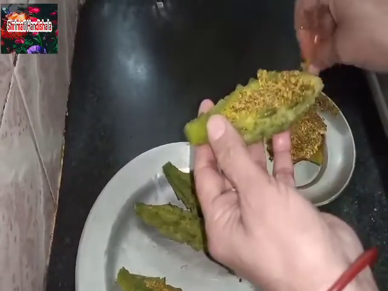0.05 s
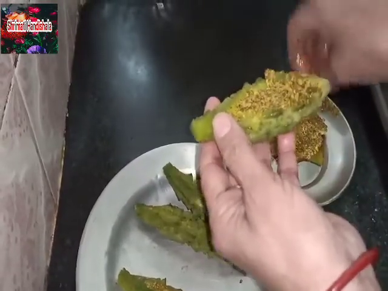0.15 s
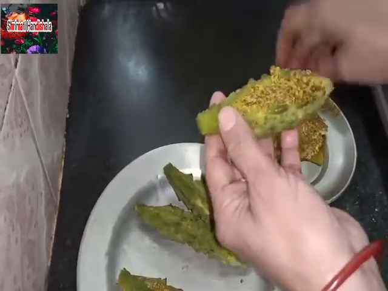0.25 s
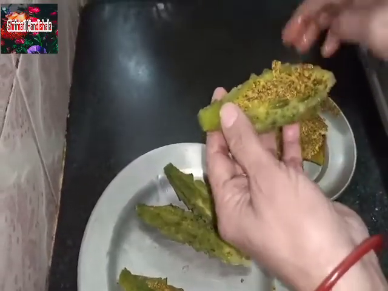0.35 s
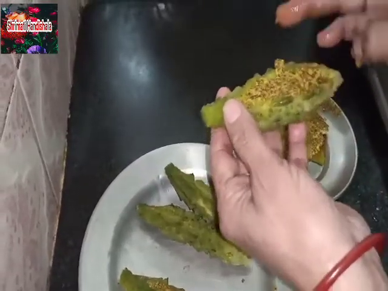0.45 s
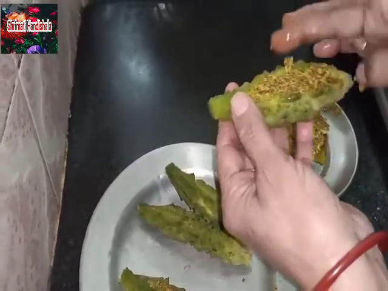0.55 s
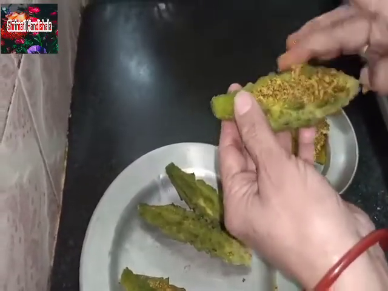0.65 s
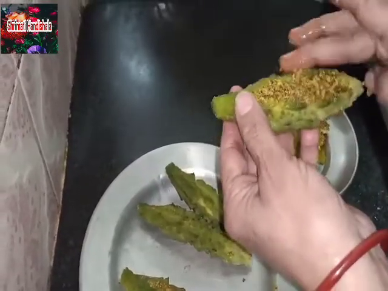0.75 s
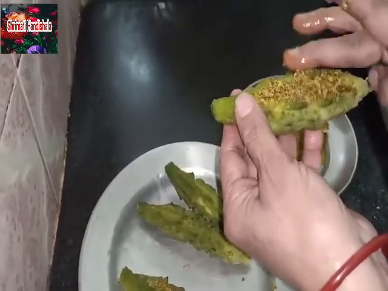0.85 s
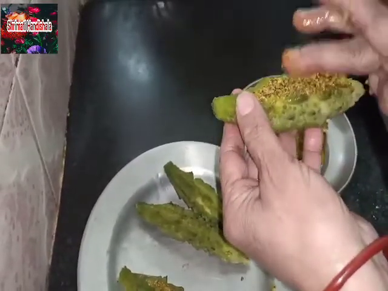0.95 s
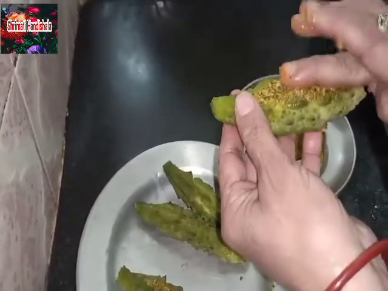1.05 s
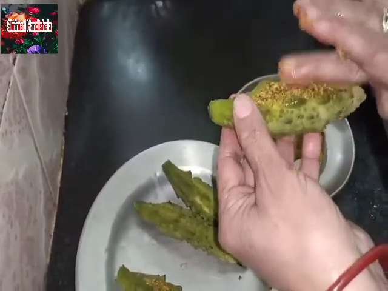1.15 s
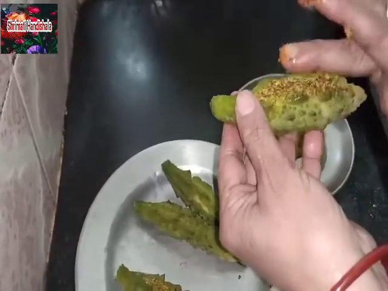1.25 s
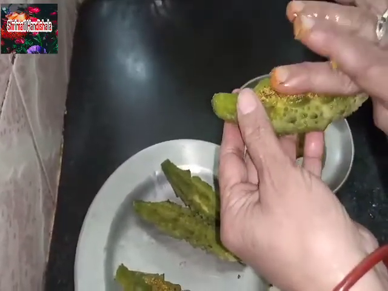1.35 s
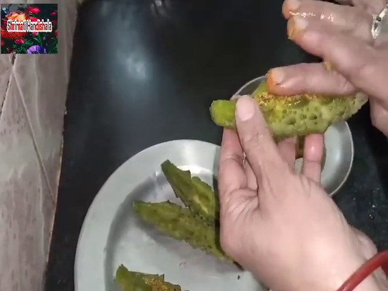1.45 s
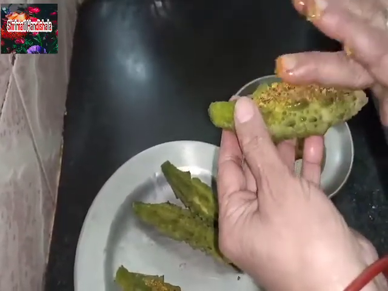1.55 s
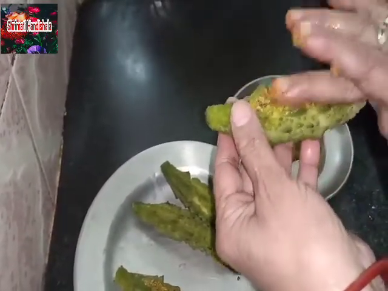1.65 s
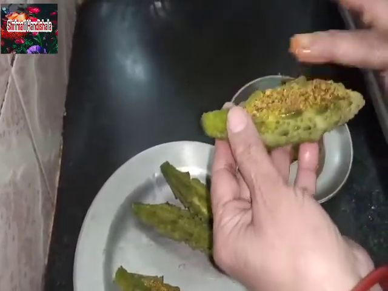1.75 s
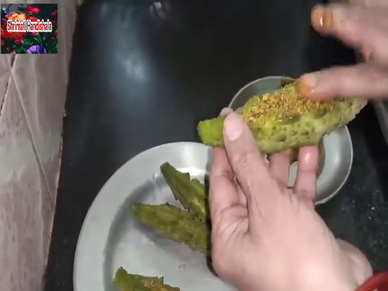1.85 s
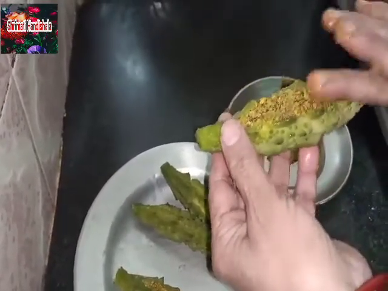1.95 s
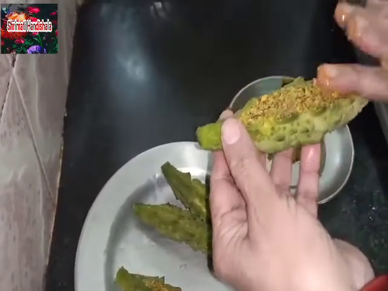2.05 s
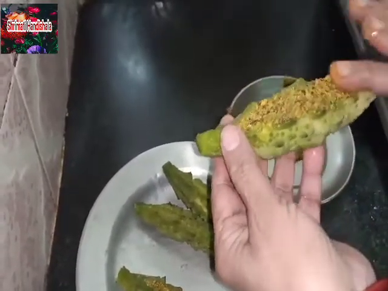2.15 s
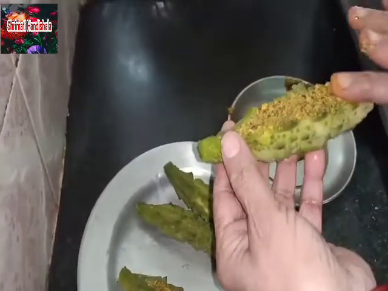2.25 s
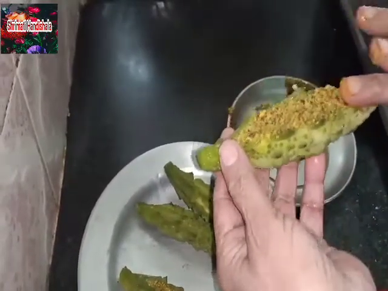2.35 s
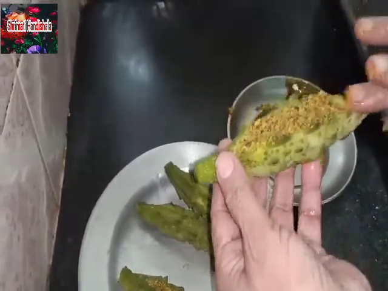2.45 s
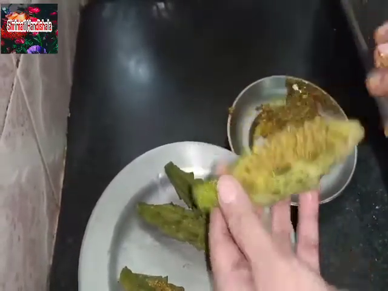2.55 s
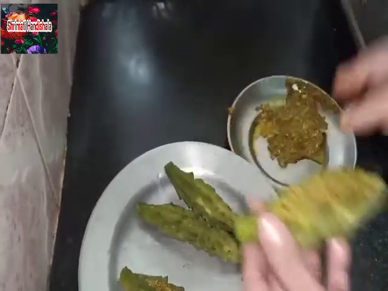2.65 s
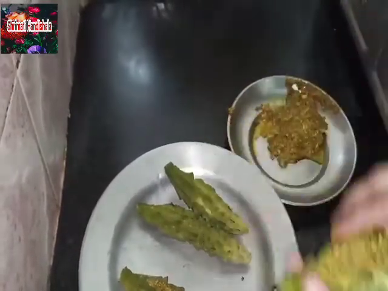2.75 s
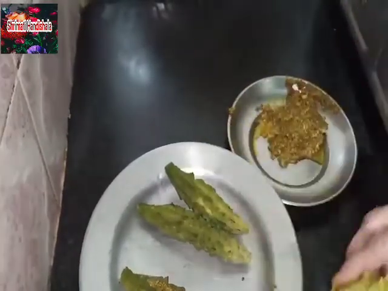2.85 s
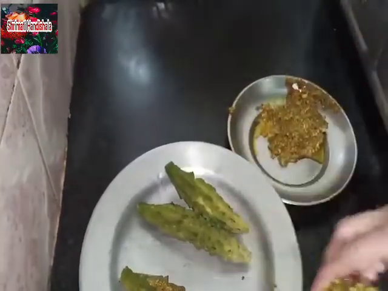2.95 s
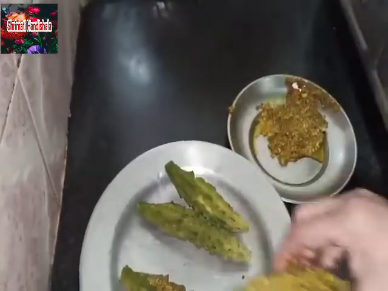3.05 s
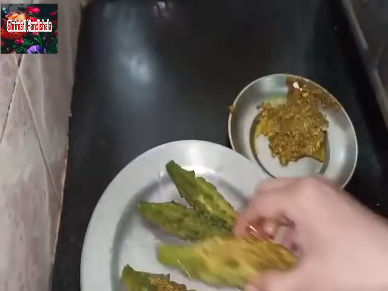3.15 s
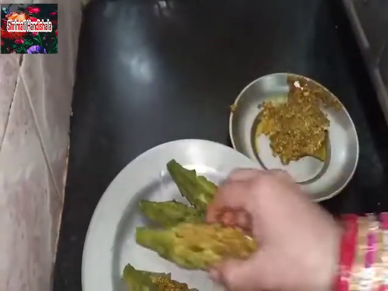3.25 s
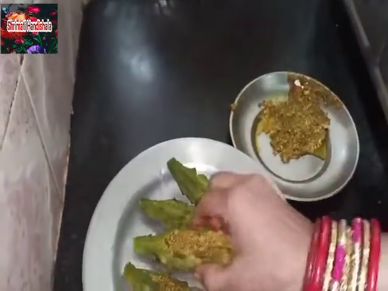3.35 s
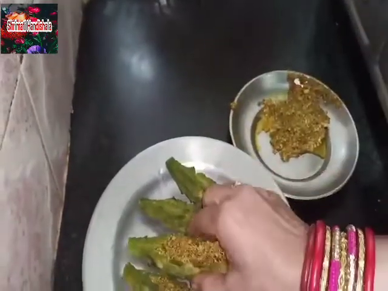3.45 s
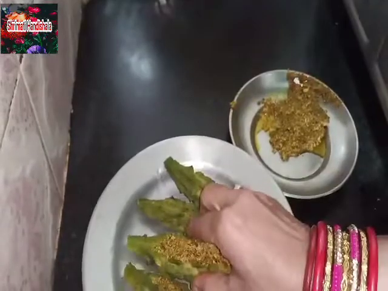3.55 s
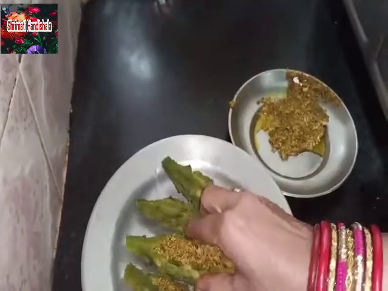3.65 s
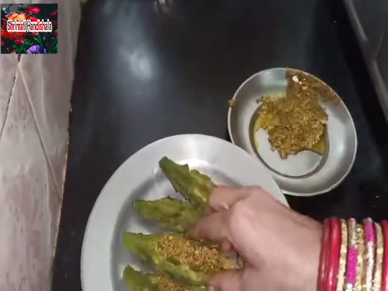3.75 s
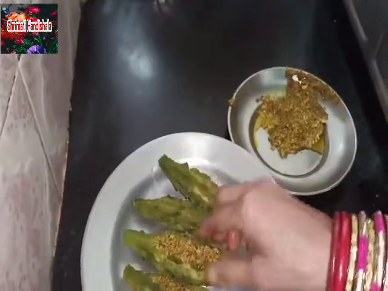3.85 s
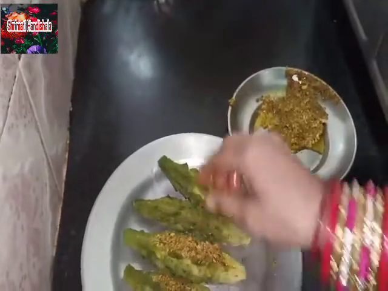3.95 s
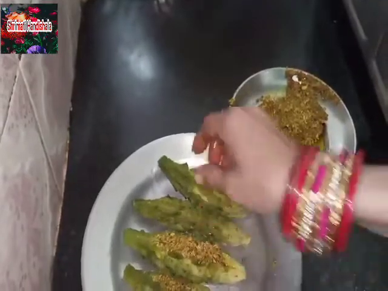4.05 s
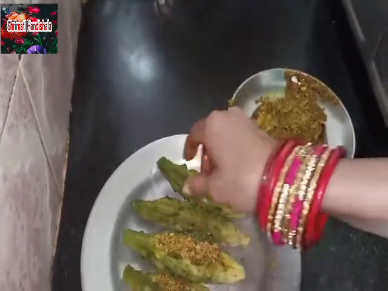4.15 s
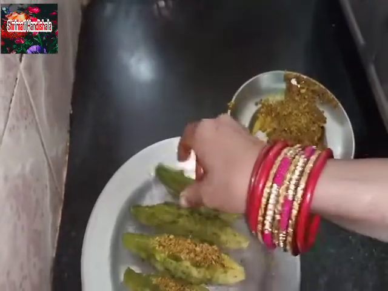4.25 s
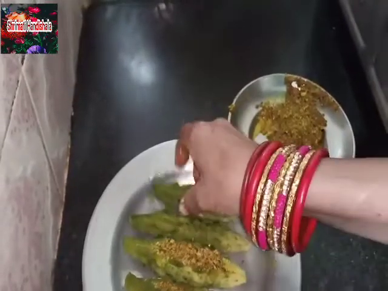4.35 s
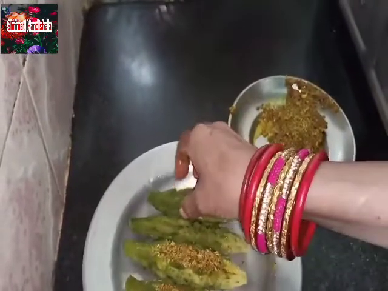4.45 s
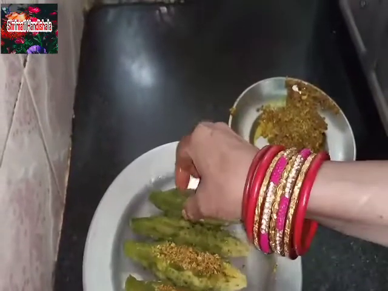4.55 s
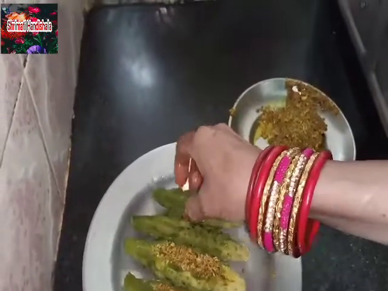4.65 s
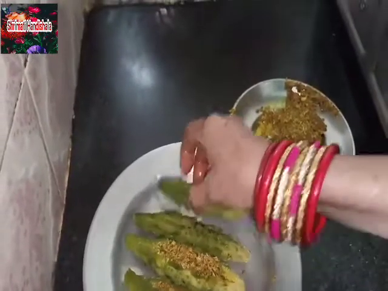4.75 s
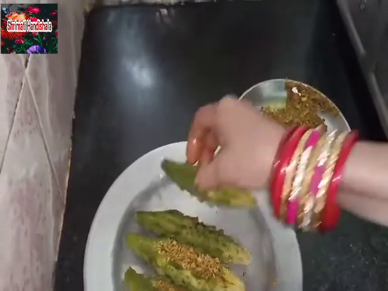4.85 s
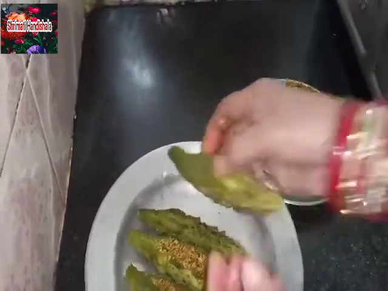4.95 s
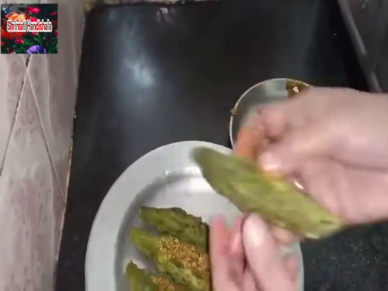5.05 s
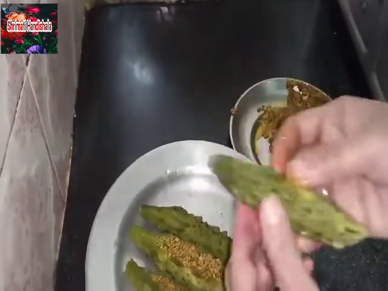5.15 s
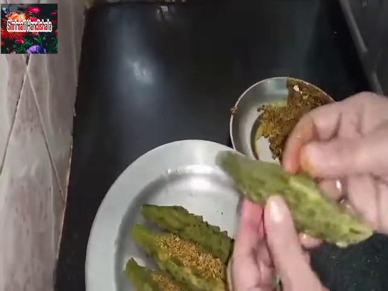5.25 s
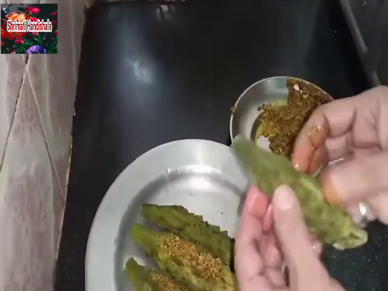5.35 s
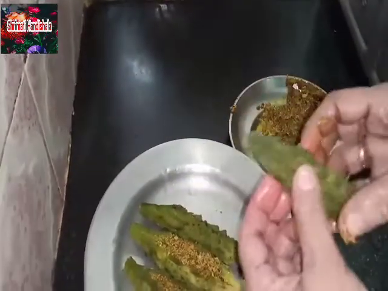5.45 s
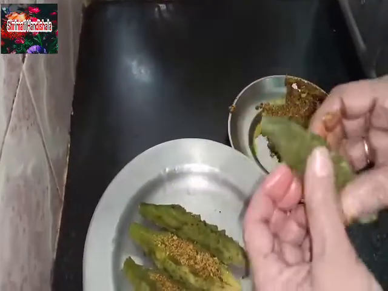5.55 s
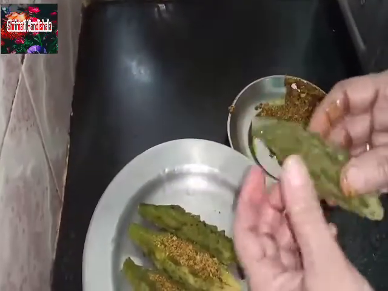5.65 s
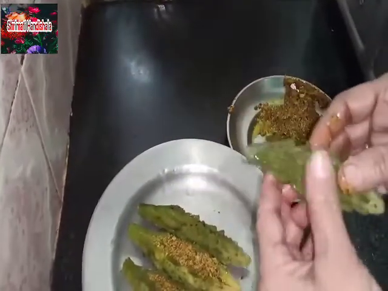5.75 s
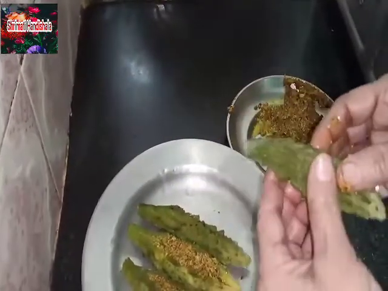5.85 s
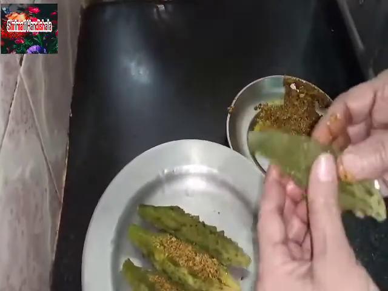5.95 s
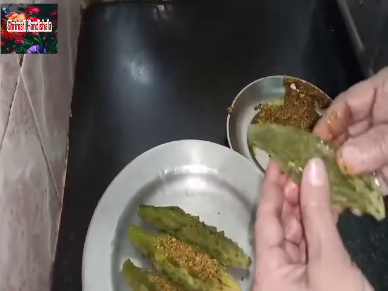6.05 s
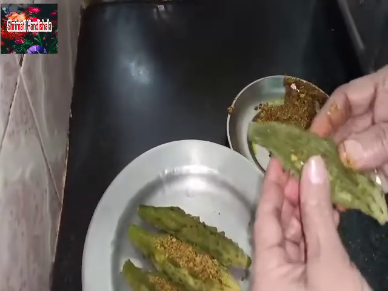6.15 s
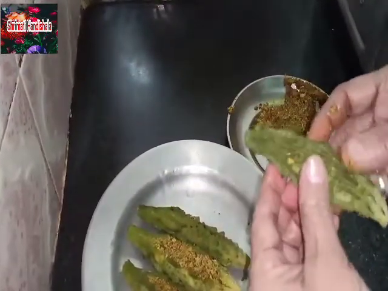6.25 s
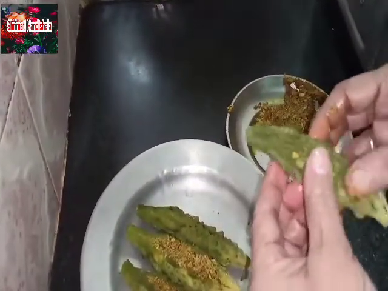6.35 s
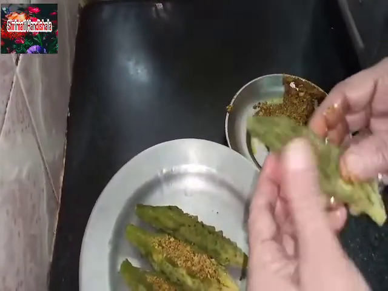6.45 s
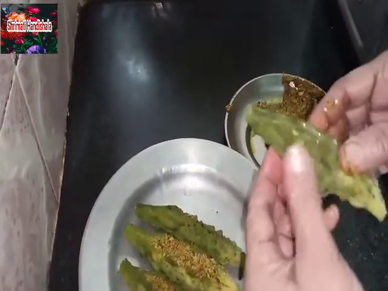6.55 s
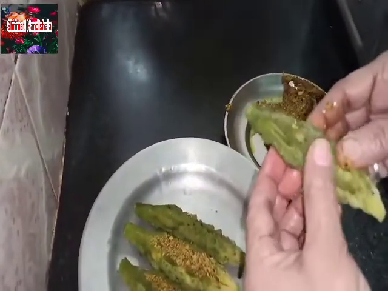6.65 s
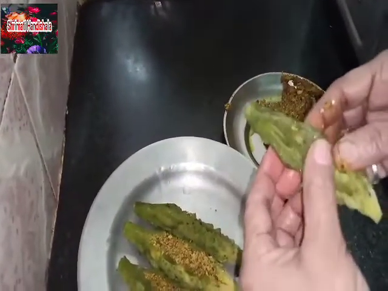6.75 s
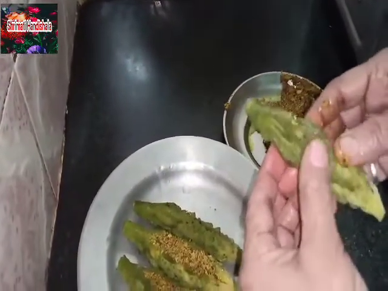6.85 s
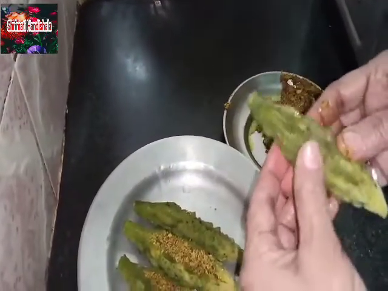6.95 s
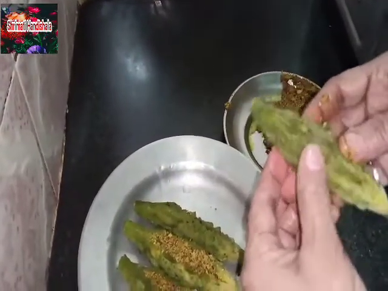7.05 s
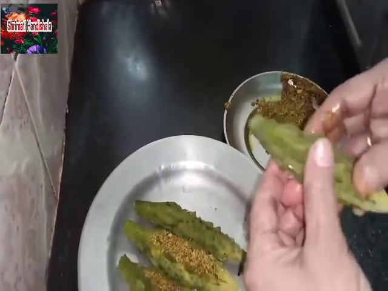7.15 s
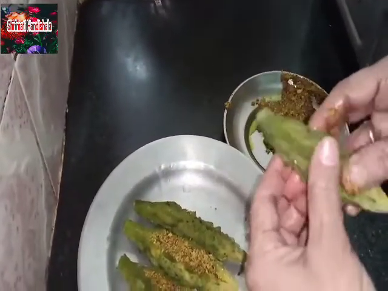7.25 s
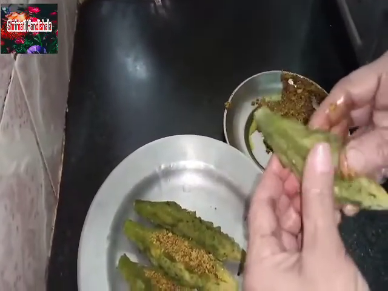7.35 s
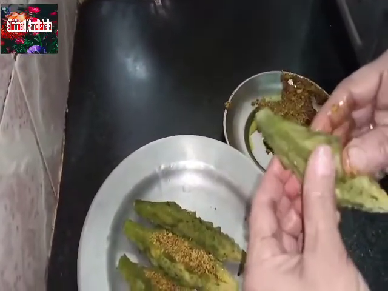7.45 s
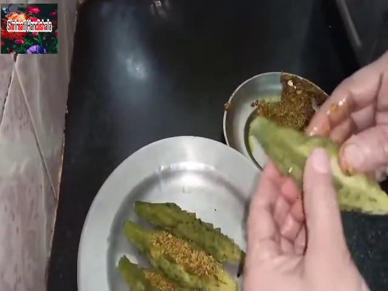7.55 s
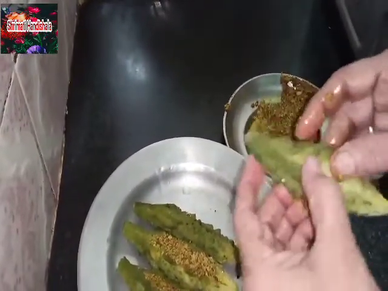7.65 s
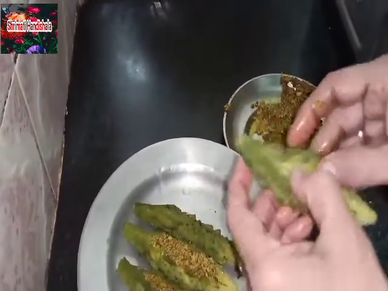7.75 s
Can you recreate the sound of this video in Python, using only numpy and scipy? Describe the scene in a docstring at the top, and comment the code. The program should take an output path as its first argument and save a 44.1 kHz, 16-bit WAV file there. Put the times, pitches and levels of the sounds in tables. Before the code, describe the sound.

A quiet domestic hum with faint hiss runs throughout. Far-off cookware clatters roomily in the first second and again after two. Nearby, hands rub and slide, glass bangles tick brightly, and vegetables set on a steel plate make short, damped metallic knocks in the middle. Later come clusters of delicate bangle rings, sparser toward the end, heard close in a small reflective kitchen.

```python
"""Household noise murmurs throughout (shaped noise) while hands rub and slide (dull noise, tiny contacts). Pots
clatter further off, mostly in the first second and again after two: damped modes with much room. From 0.4 s
glass bangles tick and ring on the wrists: contact noise, beating hoops, low hoop modes. From 3.4 to 4.7 s, and
faintly after 6 s, a steel plate is knocked as the hands stuff vegetables. It all happens in a small hard-walled
kitchen, close to two unlike microphones."""
import sys
import numpy as np
from scipy import signal
from scipy.fft import rfft, irfft, next_fast_len
from scipy.io import wavfile
from scipy.ndimage import uniform_filter1d, map_coordinates

SR = 44100
rng = np.random.default_rng(int(sys.argv[2]) if len(sys.argv) > 2 else 0)


def wav_out(sig):
    """Save sig, one row per channel (or a flat mono array), as 16-bit PCM at SR to the path in sys.argv[1]."""
    wavfile.write(sys.argv[1], SR, np.round(np.clip(np.atleast_2d(sig).T, -1, 1) * 32767).astype(np.int16))


N = 343539
SPAN = 24000  # samples in one struck sound with its room
T = np.arange(SPAN) / SR
HZ = np.fft.rfftfreq(SPAN, 1 / SR)

# Colour of a bangle contact, also of the patter of the hands. Each row: frequency in Hz, level in dB.
CONTACT_COLOUR = [(300, -20.5), (1500, -10), (2500, 1), (5000, 3), (7500, 0.5), (10000, -1), (16000, 12.5)]


def amp(db):
    """Decibels to gain."""
    return 10 ** (np.asarray(db) / 20)


def unit(x):
    """Scaled to rms 1."""
    return x / np.sqrt(np.mean(x ** 2) + 1e-20)


def along(points, hz):
    """A curve through (Hz, value) points on a log frequency axis, level beyond its ends."""
    f, v = np.transpose(points)
    return np.interp(np.log(hz + 1), np.log(f + 1), v)


def filtered(x, response):
    """x times a response of frequency, without phase shift."""
    m = next_fast_len(N + 8192)
    return irfft(rfft(x, m) * response(np.fft.rfftfreq(m, 1 / SR)), m)[..., :N]


def causal(points):
    """A minimum-phase response through (Hz, dB) points, so that nothing sounds ahead of its blow."""
    cepstrum = irfft(np.log(amp(along(points, HZ)) + 1e-6), SPAN)
    cepstrum[1:SPAN // 2] *= 2
    cepstrum[SPAN // 2 + 1:] = 0
    return np.exp(rfft(cepstrum))


def wobble(rate):
    """A smooth random curve, rate knots a second."""
    return map_coordinates(rng.standard_normal(int(N * rate / SR) + 4), [np.arange(N) * rate / SR])


def dying(t60):
    """A fall of 60 dB in t60 seconds."""
    return amp(-60 * T / np.maximum(t60, .001))


def ringing(modes, spread_db, blur_hz):
    """Damped modes at new strengths; whatever rests on the object makes their phase drift."""
    hz, db, t60 = np.transpose(modes)[:, :, None, None]
    hold = 100  # samples between steps of the drift
    step_size = np.sqrt(2 * np.pi * abs(blur_hz) * hold / SR)
    steps = step_size * rng.standard_normal((len(modes), 1, SPAN // hold))
    drift = uniform_filter1d(np.repeat(np.cumsum(steps, -1), hold, -1), size=hold)
    # the two channels start about a quarter turn apart
    phase = rng.normal([[0], [np.pi / 2]], .5, (len(modes), 2, 1)) + drift
    strength = amp(db + spread_db * rng.standard_normal((len(modes), 2, 1)))
    tones = strength * dying(t60) * np.sin(2 * np.pi * hz * T + phase)
    return tones.sum(0) * (1 - np.exp(-T / 0.0014))


def crack(colour, t60):
    """A short burst of coloured noise whose first moments have rms near 1."""
    gain = causal(colour)
    burst = rng.standard_normal((2, SPAN)) * dying(t60)
    return irfft(rfft(burst) * gain / np.sqrt(np.mean(abs(gain) ** 2)), SPAN)


def heard(sound, wet_db, colour=((100, 0),), beyond_db=0):
    """The direct sound plus the answer of the walls, which builds within a few milliseconds."""
    # The kitchen, then the rooms beyond it. Each row: level in dB, t60 in seconds.
    rooms = [(1.5, 0.21), (-13, 0.69)]
    (near_db, near_t60), (far_db, far_t60) = rooms
    bright = rng.standard_normal((2, SPAN))
    # curtains and doorways dull what returns from the rooms beyond
    dull = signal.lfilter(*signal.butter(2, 5900, fs=SR), bright)
    kitchen = amp(near_db) * dying(near_t60) * bright
    beyond = amp(far_db + beyond_db) * dying(far_t60) * dull
    walls = (kitchen + beyond) * (1 - np.exp(-T / 0.0011))
    path = 1 + amp(wet_db) * rfft(walls) / np.linalg.norm(walls[0])
    fade = np.cos(np.pi / 2 * T / T[-1])
    return irfft(rfft(sound) * path * causal(colour), SPAN) * fade


def add(out, s, db, pan_db, sound):
    """Lay a sound into the scene at s seconds; pan_db is left minus right."""
    gain = amp(db + np.array([[.5], [-.5]]) * pan_db)
    out[:, max(round(s * SR), 0):][:, :SPAN] += gain * sound


def murmur():
    """Household noise through the walls: a low hum lifted by standing waves, and a hiss, both patchy."""
    # Tilt of the noise. Each row: frequency in Hz, relative density in dB.
    tilt = [(25, -25), (65, -20), (105, -1), (170, -5), (280, -11.5), (450, -29), (800, -24), (2600, -23),
            (3600, -34.5), (6200, -28), (8200, -43), (11000, -39), (15000, -51), (16500, -72.5)]
    # Standing waves of the room. Each row: centre in Hz, width in Hz, lift in dB.
    standing_waves = [(111, 16, 3), (143, 5.2, 6), (255, 25, 7.5)]
    patchy_db = 2.4  # rms unevenness over time and frequency

    z = signal.stft(rng.standard_normal((2, N)), nperseg=1024)[2]
    patches = uniform_filter1d(uniform_filter1d(rng.standard_normal(z.shape[1:]), 8, 0), 4, 1)
    noise = signal.istft(z * amp(patchy_db * unit(patches)), nperseg=1024)[1][:, :N]

    def colour(hz):
        boom_db = sum(db / (1 + (2 * (hz - c) / w) ** 2) for c, w, db in standing_waves)
        return amp(along(tilt, hz) + boom_db)

    return amp(-64.0) * unit(filtered(noise, colour))


def handling():
    """A dull rub, and a patter of tiny contacts in clumps that the walls spread out."""
    # Hands at work. Each row: time in seconds, sleeve and table rub in dB, fingers and hoops sliding in dB.
    work = [(0, -42.5, -39), (.55, -70.5, -73), (.8, -70.5, -43.5), (1.05, -58.5, -63.5),
            (1.401, -79.5, -78), (2.1, -75, -73), (2.6, -65, -58.5), (3.05, -81.5, -83), (3.25, -68.5, -53),
            (3.5, -65.5, -62), (3.8, -71.5, -69.5), (4.3, -68, -58.5), (4.999, -65.5, -56.5),
            (5.2, -74, -55), (5.6, -69, -59), (6.4, -75.5, -80), (6.8, -75.5, -85), (7.79, -77, -70)]
    # Colour of the rub. Each row: frequency in Hz, level in dB.
    rub_colour = [(150, -30), (300, 0.5), (420, -1.5), (650, -6), (1200, -15), (3000, -65)]
    rub_lumps_db, contacts_per_s = 2, 500
    s, rub_db, slide_db = np.transpose(work)
    t = np.arange(N) / SR

    friction = filtered(rng.standard_normal((2, N)), lambda hz: amp(along(rub_colour, hz)))
    rub = unit(amp(rub_lumps_db * wobble(22)) * friction)

    contact_db = 6.4 * wobble(23) + 1.6 * rng.exponential(size=N)
    contacts = (rng.random(N) < contacts_per_s / SR) * amp(contact_db)
    one = heard(crack(CONTACT_COLOUR, 0.0012), wet_db=2.5)
    patter = unit(signal.fftconvolve(contacts[None], one, axes=1)[:, :N])
    return amp(np.interp(t, s, rub_db)) * rub + amp(np.interp(t, s, slide_db)) * patter


def clatter():
    """Far pots: little direct sound, much room; each blow favours the body or the rim."""
    # Blows on pots further off. Each row: start in seconds, strength in dB, body in dB, edge in dB,
    # clang of a rim in dB, clack of a lid in dB.
    blows = [(.0034, -20, -8.5, 9.5, -12, -3.5), (0.0192, -18, -6.5, 4, 4, -19),
             (0.2475, -48.5, 10.5, 5, 8, -18), (.267, -21, -14, 11.5, -3.5, -5),
             (0.795, -41.5, 10.5, 1, -19, 8), (0.823, -38, 2, -7, -12, 0), (0.9834, -50.5, -16, 1, -6, -6),
             (1.1106, -35, -9, 2.5, -5, -13.5), (1.1145, -34, 7.5, -22, -8, 5.5),
             (2.073, -60.5, -20, 10.5, 10, -16), (2.163, -44.5, -6, 18, 19, 7),
             (2.239, -20.5, -11, 1.5, -1.5, -16), (2.4002, -25.5, -14.5, 0, 2, -22.5),
             (2.527, -40, 1.5, 16.5, 20, -18)]
    # Modes of the pots, their rims (broad, quickly damped) and their lids.
    # Each row: frequency in Hz, level in dB, t60 in seconds.
    pot_modes = [(210, -27, 0.35), (257, -19, 0.3), (340, -31, 0.7), (468, -27, 0.15), (547, -25, 0.16),
                 (626, -26, 0.2), (889, -25, 0.18), (1060, -29, 0.09), (1667, -27, 0.033)]
    rim_modes = [(1045, -22, 0.02), (2080, -9, 0.008), (2245, -9, .01), (3060, -5, 0.007),
                 (3380, -5, 0.008), (5120, -12, 0.006), (6740, -17, 0.007)]
    lid_modes = [(2145, -9, .03), (2270, -12, .015), (2595, -11, .03), (2820, -17, .015)]
    # The contact noise is thin under the low modes. Each row: frequency in Hz, level in dB.
    scrape_colour = [(700, -8), (1500, 0)]
    gap_db, middle_db, rim_spread_db = -2, 3, 1.5

    out = np.zeros((2, N + SPAN))
    for s, db, body_db, edge_db, clang_db, lid_db in blows:
        colour = [(60, body_db - 31.0), (250, body_db - 3.0), (800, .5 * body_db + 7.0),
                  (1250, gap_db - .5 * lid_db),  # thinner the more a lid is struck
                  (1800, middle_db), (3200, 0.34),
                  (5500, edge_db - 4.0), (8500, edge_db - 17.0), (15000, edge_db - 17.5)]
        scrape = crack(scrape_colour, 0.028) * (1 - np.exp(-T / 0.002))
        body = ringing(pot_modes, spread_db=2.5, blur_hz=7.1)
        clang = amp(clang_db) * ringing(rim_modes, spread_db=rim_spread_db, blur_hz=30.2)
        clack = amp(lid_db) * ringing(lid_modes, spread_db=rim_spread_db, blur_hz=39)
        blow = scrape + body + clang + clack
        add(out, s, db, 0, heard(blow, wet_db=6.5, colour=colour))
    return out[:, :N]


def bangles():
    """Each touch scrapes briefly, rings the struck hoop, rings its neighbours and wakes the hoops' lowest
    modes."""
    # Bangle touches. Each row: start in seconds, strength in dB, struck hoop in Hz, its ring in dB, # lowest
    # modes of the hoops in dB.
    touches = [(.378, -69, 6440, 16, -12), (0.4572, -53, 7400, 2, -19), (0.505, -42, 7280, 1.5, -12.5),
               (0.543, -44, 6570, -11, -11), (0.5948, -38.5, 6570, -13.5, -23), (0.698, -41, 6720, -2, -14),
               (0.716, -38.5, 8640, -5, -16), (0.7581, -35, 7070, -9.5, -34),
               (0.7716, -34.5, 8440, -3, -14.5), (1.7597, -52.5, 5980, -8.5, -28),
               (1.798, -57.5, 6140, -17, -22), (1.8444, -55.5, 6630, -3, -37),
               (2.7507, -60.5, 6970, 1, -17), (2.7648, -38, 7320, -7.5, -12.5),
               (2.842, -62, 6950, 3.5, -30), (2.927, -44.5, 7540, -13.5, -46),
               (3.079, -53.5, 6220, -2, -28), (3.092, -40, 6360, -17, -22), (3.1493, -46, 7100, 0, -15),
               (3.1675, -33.5, 7070, -4, -10), (3.1888, -32, 7040, -7.5, -15.5),
               (3.221, -46.5, 6720, -7.5, -6.5), (3.404, -47, 7200, -1, -26),
               (3.421, -40, 6250, -11.5, -28), (3.494, -44, 6400, 2.5, -46), (3.679, -44, 8510, -11, -18),
               (4.1655, -39, 6960, 1.5, -36), (4.1865, -19.5, 7484, -12.5, -27.5),
               (4.2, -35, 7740, -22, -26), (4.288, -43.5, 7060, -16.5, -49),
               (4.877, -56.5, 6720, -1.5, -23), (5.073, -46.5, 7620, -13, -17),
               (5.1228, -42, 5740, -12.5, -17.5), (5.167, -47.5, 6950, -0.5, -25),
               (5.194, -44, 6490, -4.5, -20), (5.208, -46.5, 4250, -12.5, -13),
               (5.2218, -51, 6750, -8, -11), (5.264, -46, 6280, -26, -12), (5.3035, -45, 4730, -22, -18),
               (5.3146, -40.5, 6950, 4.5, -19), (5.3408, -48, 7120, -6, -16), (5.386, -22, 7430, -3.5, -22),
               (5.437, -29.5, 8460, -26, -17.5), (5.508, -45.5, 6430, -17, -16),
               (5.5417, -58, 7420, 7.5, -20), (5.5943, -53, 6870, -7.5, -26), (5.6486, -36, 6400, -12, -17),
               (5.7206, -48.5, 6320, -12.5, -11), (5.7772, -28, 7180, 1.5, -17),
               (5.818, -44, 7100, -10, -20), (5.868, -49, 6660, -5, -29), (5.913, -53.5, 8360, -14, -6.5),
               (5.9704, -52.5, 6400, -11, -21), (6.107, -49.5, 7550, -2.5, -9),
               (6.177, -41, 7270, 5.5, -14), (6.2167, -41.5, 7450, -16, -15), (6.308, -63, 4350, 0, -25),
               (6.6465, -51, 7520, 3.5, -6), (6.714, -52.5, 3780, -17.5, -15.5),
               (6.8273, -53.5, 6450, -5, -21), (7.06, -39, 7230, 5, -16.5),
               (7.206, -53, 3920, -14.5, -19.5), (7.2356, -59, 3830, -14, -29),
               (7.443, -49.5, 7360, -4.5, -12)]
    # The other hoops. Each row: frequency in Hz, level in dB.
    neighbours = [(6570, -7.5), (6960, -31.5), (7380, -8), (8420, -35), (8570, -7), (9170, -4.5)]
    # Upper bending modes of a hoop. Each row: level in dB, t60 in seconds.
    bending = [(-4, 0.041), (-5, 0.013)]
    # Where those modes lie, as shares of the hoop's pitch.
    shares = (1, 1.885)
    # Lowest modes of the hoops. Each row: frequency in Hz, level in dB, t60 in seconds.
    low_modes = [(2640, 0, 0.08), (2765, -8, .08), (2985, -1, 0.08), (3135, -4, 0.03)]
    # Where the wrists are. Each row: time in seconds, left minus right in dB.
    wrists = [(0, 3), (2.8, 4), (4.2, 2), (5.4, 10), (5.65, 3), (5.8, 8), (6.6, 2), (7.06, 15), (7.5, 3)]
    stray_db = 2.5  # how far a touch strays from the wrist's place
    twin = .991  # pitch share of a mode's partner
    own_share, own_db = .357, 4  # the struck hoop's lowest mode: share of its pitch, and its lift
    close_db = -9  # the bangles, close by and bright, stir the rooms beyond less

    out = np.zeros((2, N + SPAN))
    for s, db, hz, ring_db, low_db in touches:
        hoops = [(hz, 2.5), (hz * twin, -4)]  # an uneven hoop splits each mode into a beating pair
        luck = rng.normal(0, 4, len(neighbours))
        hoops += [(f, level + more) for (f, level), more in zip(neighbours, luck)]
        modes = [(f * share, level + mode_db + ring_db, t60)
                 for f, level in hoops
                 for share, (mode_db, t60) in zip(shares, bending)]
        lowest = []
        for f, level, t60 in low_modes:
            is_own = abs(f / (hz * own_share) - 1) < .04
            lowest.append((f * rng.normal(1, 0.0047), level + low_db + own_db * is_own, t60))
        tick = crack(CONTACT_COLOUR, 0.031)
        ring = ringing(modes, spread_db=3.0, blur_hz=32.5)
        low_ring = ringing(lowest, spread_db=2.5, blur_hz=8)
        pan_db = np.interp(s, *np.transpose(wrists)) + stray_db * rng.standard_normal()
        add(out, s, db, pan_db, heard(tick + ring + low_ring, wet_db=-1.5, beyond_db=close_db))
    return out[:, :N]


def plate():
    """A sharp contact and a weaker second one, each with the plate's modes under the load of vegetables."""
    # Knocks on the plate. Each row: start in seconds, strength in dB, ring in dB,
    # edge in dB (low for a soft contact), lasting tones in dB (low under a hand).
    knocks = [(3.446, -38.5, -13, 3.5, -8), (3.4686, -38.5, -21, 13.5, 1), (3.5059, -17.5, -3.5, -1.5, -11),
              (3.7195, -28, -14, -89, -29), (3.8958, -56, 6.5, -22, 11), (3.906, -36.5, 1.5, -25, -16),
              (3.934, -18, -9.5, 1, 0), (4.0312, -18.5, -9, -15, -2), (4.184, -26, -9, -16, -4),
              (4.2195, -19.5, -11, -6.5, -4), (4.345, -27, -18.5, -13.5, -17), (4.375, -44, -0.5, -17, -22),
              (4.4163, -12.5, -14, -10.5, -7), (4.5143, -28.5, -3.5, -8, -13), (4.5286, -14, -5, -6, -14.5),
              (4.5467, -14.5, -26, -7.5, -11), (4.7096, -4, -13, -3, 0), (6.374, -55.5, -10.5, -15, -6),
              (6.785, -45.5, -12.5, 1, -21), (6.8026, -56, 2, -6.5, -1), (6.81, -56, 0, -18, -15),
              (7.6119, -55, -13, -7, -2.5)]
    # Modes of the plate. Each row: frequency in Hz, level in dB, t60 in seconds.
    plate_modes = [(440, -17, 0.12), (1100, -8, 0.04), (1196, -19, 0.28), (1387, -16, 0.06),
                   (1671, -4, 0.05), (1699, -7, 0.05), (1850, -3, 0.05), (1911, -6, 0.29),
                   (2183, -13, 0.07), (2284, -11, 0.08), (2585, -12, .07), (2660, -24, 0.5),
                   (3020, -9, .045), (3580, -9, .06), (3812, -12, .06), (4560, -15, 0.05), (6200, -8, .03),
                   (6492, -19, .14)]
    rock_s, rock_db = .011, -12  # the plate rocks and meets the counter a second time
    body_db, pan_db = -10.5, -2.5
    contact_t60, rise_s = .022, .0006
    lasting_s = .2  # modes that outlive this are the ones a hand can still
    soft_share = .2  # share of the edge loss that already dulls the plate's main tone

    out = np.zeros((2, N + SPAN))
    for s, db, ring_db, edge_db, lasting_db in knocks:
        modes = [(hz, level + lasting_db * (t60 > lasting_s), t60) for hz, level, t60 in plate_modes]
        colour = [(35, body_db - 45.5), (100, body_db - 4), (700, body_db), (1400, 0.015),
                  (1700, 0.00041), (2100, soft_share * edge_db),
                  (4500, edge_db), (12000, edge_db - 17.0)]
        for late_s, loss_db in ((0, 0), (rock_s, rock_db)):
            contact = crack([(100, 0)], contact_t60) * (1 - np.exp(-T / rise_s))
            ring = amp(ring_db) * ringing(modes, spread_db=2, blur_hz=3)
            blow = heard(contact + ring, wet_db=-8.5, colour=colour)
            add(out, s + late_s, db + loss_db, pan_db, blow)
    return out[:, :N]


def scene():
    """Everything at the microphones: the treble of the near sounds falls off, the murmur joins as it is."""
    # Microphone fall-off. Each row: frequency in Hz, level in dB.
    fall_off = [(7700, 3.5), (9000, -5.5), (15000, -21.5), (16400, -25)]
    hands = handling() + clatter() + bangles() + plate()
    return filtered(hands, lambda hz: amp(along(fall_off, hz))) + murmur()


def record(dry):
    """Between about 100 and 250 Hz the ports hear nearly alike, each port has its colour, and the hardest peaks
    round off."""
    # How unlike the two ports hear. Each row: frequency in Hz, side level in dB.
    unlike = [(40, 0.5), (100, -11.5), (250, -11), (500, -1), (900, -0.5)]
    # Colour of the ports. Each row: frequency in Hz, left minus right in dB.
    port_colour = [(100, -1.5), (700, 0.5), (1300, -2.5), (2500, -6.5), (4500, -10.5), (7000, -7.5),
                   (9000, 2), (14000, 3)]
    ceiling, top_hz = .95, 16500
    mid = (dry[0] + dry[1]) / 2
    side = filtered((dry[0] - dry[1]) / 2, lambda hz: amp(along(unlike, hz)))
    pair = np.array([mid + side, mid - side])
    pair = filtered(pair, lambda hz: amp(np.outer([.5, -.5], along(port_colour, hz))))
    pair = pair / (1 + abs(pair / ceiling) ** 6) ** (1 / 6)
    return filtered(pair, lambda hz: hz < top_hz)  # nothing passes above the band limit


dry = scene()
out = record(dry)
wav_out(out)
```